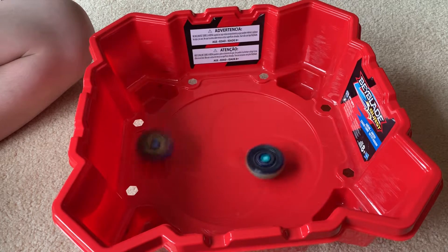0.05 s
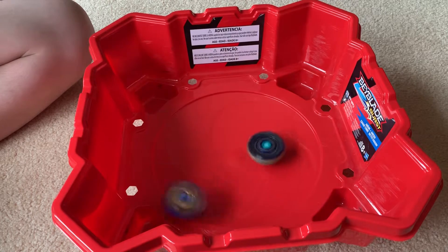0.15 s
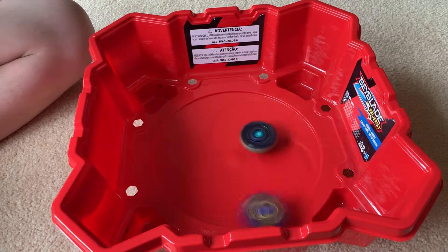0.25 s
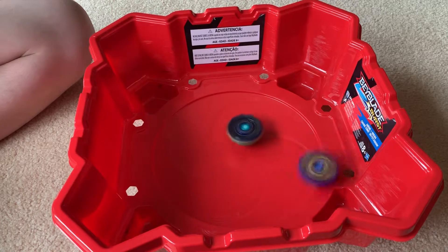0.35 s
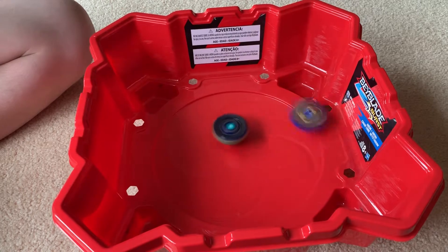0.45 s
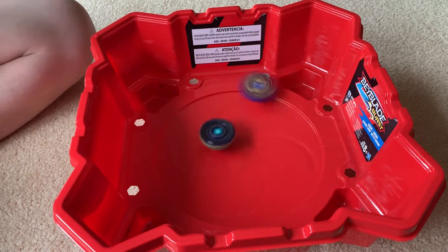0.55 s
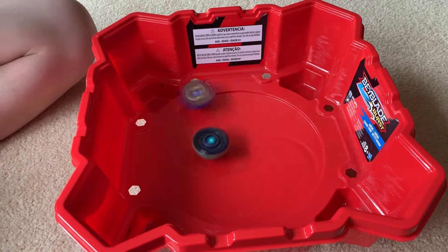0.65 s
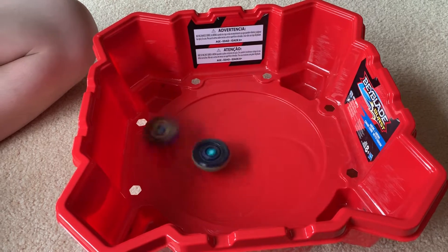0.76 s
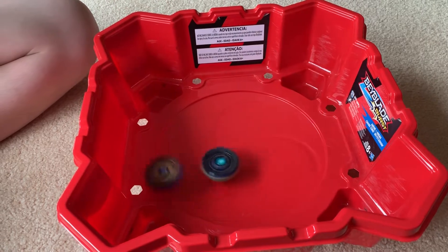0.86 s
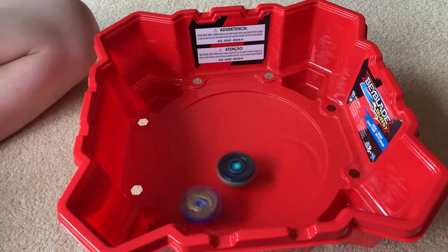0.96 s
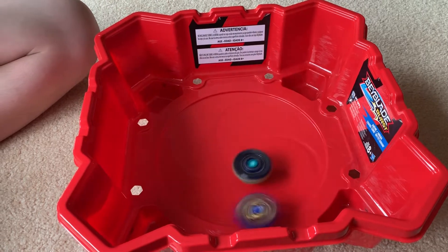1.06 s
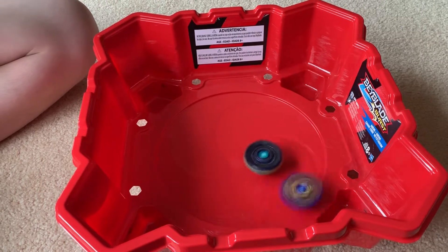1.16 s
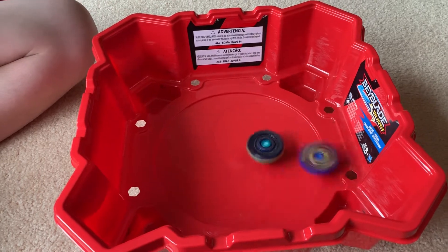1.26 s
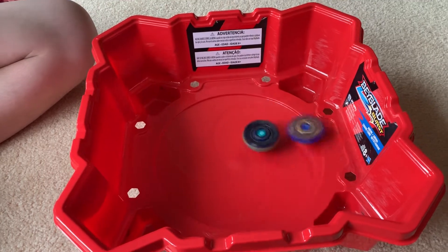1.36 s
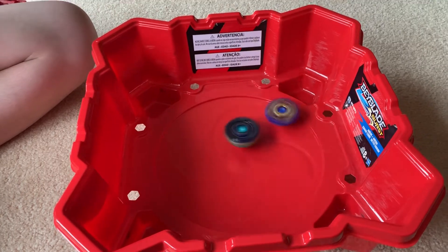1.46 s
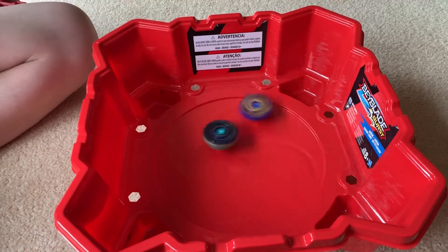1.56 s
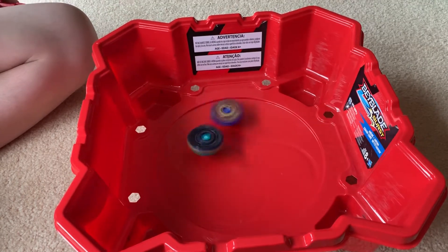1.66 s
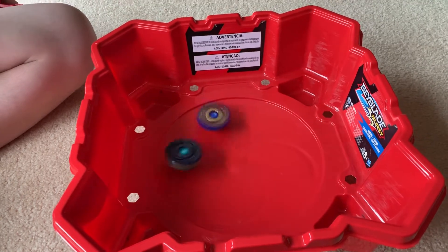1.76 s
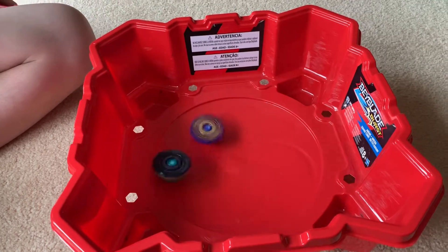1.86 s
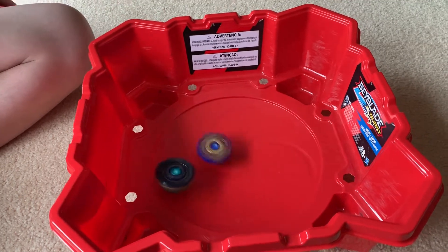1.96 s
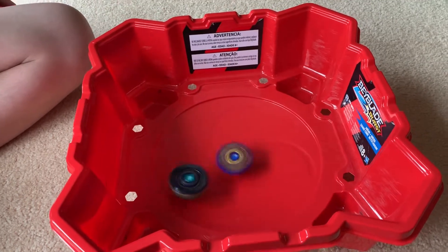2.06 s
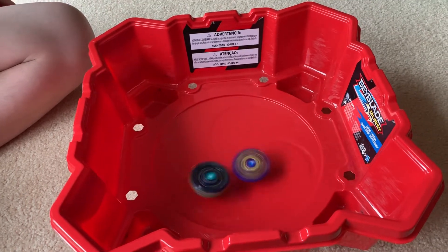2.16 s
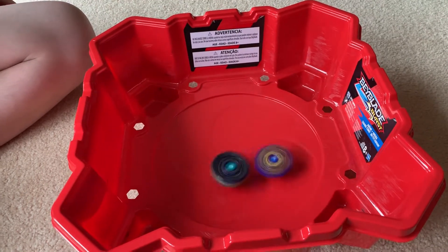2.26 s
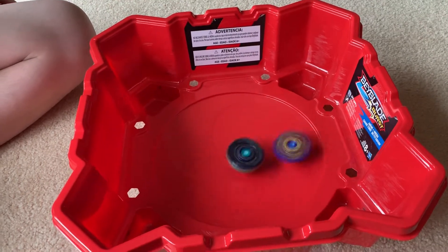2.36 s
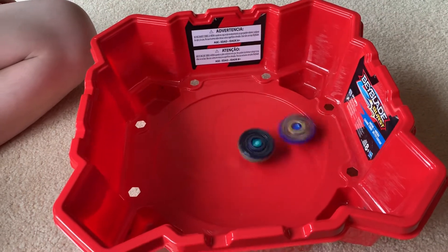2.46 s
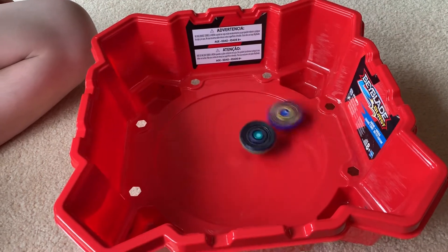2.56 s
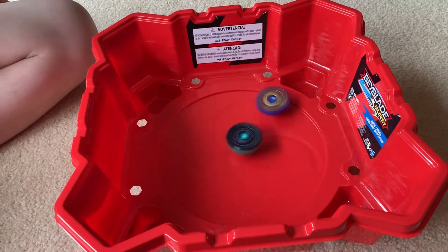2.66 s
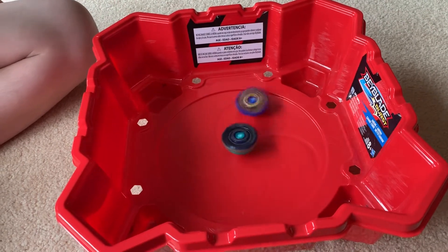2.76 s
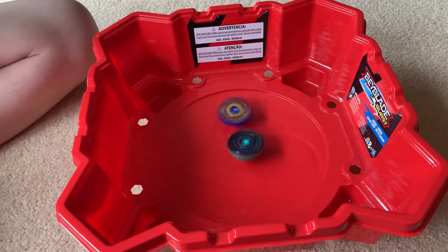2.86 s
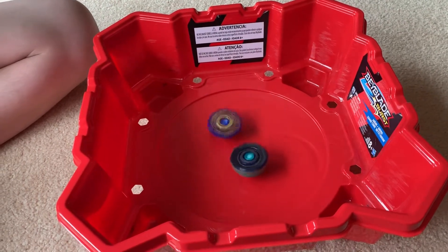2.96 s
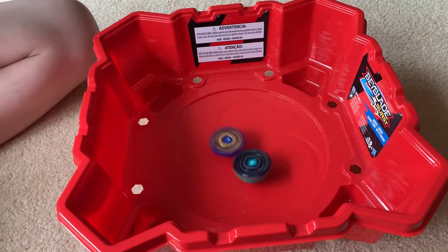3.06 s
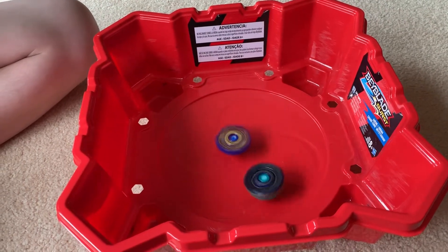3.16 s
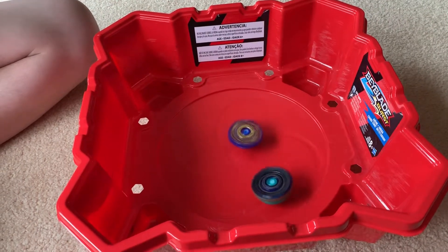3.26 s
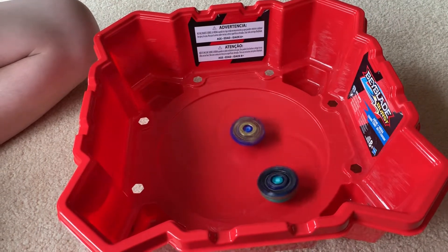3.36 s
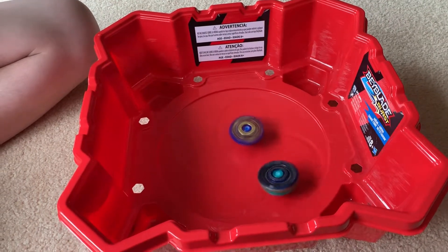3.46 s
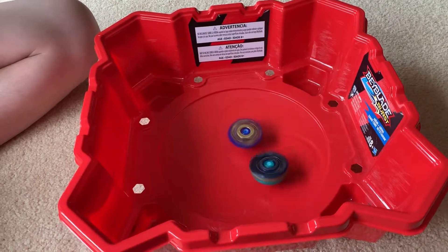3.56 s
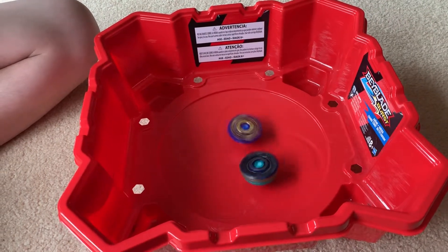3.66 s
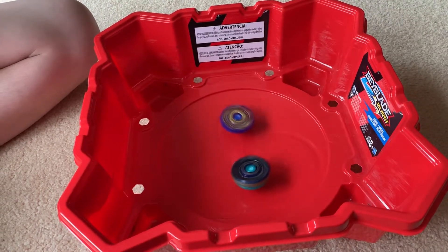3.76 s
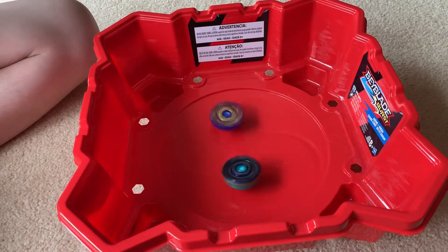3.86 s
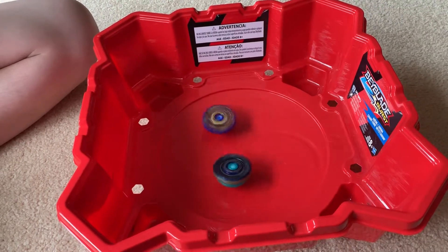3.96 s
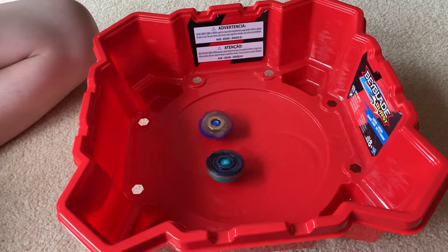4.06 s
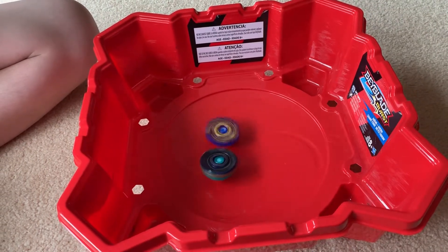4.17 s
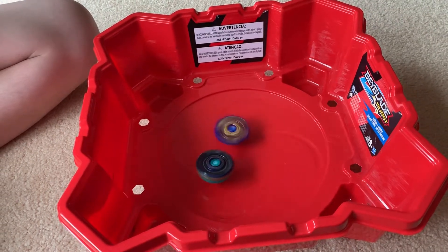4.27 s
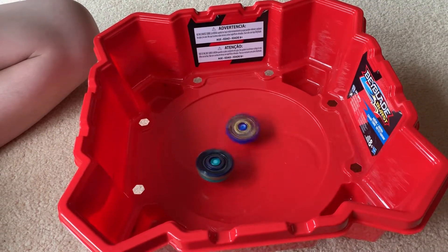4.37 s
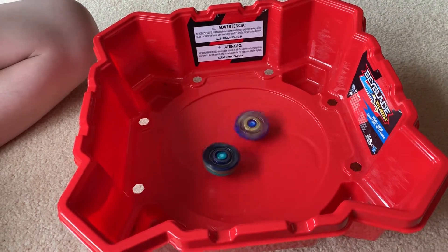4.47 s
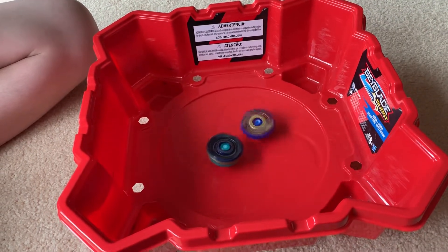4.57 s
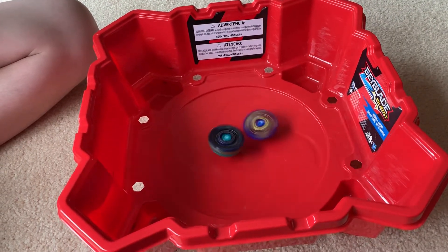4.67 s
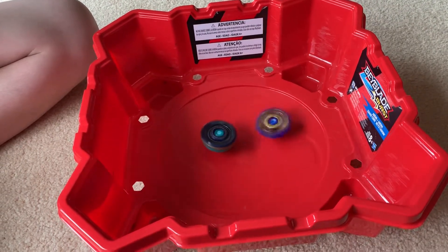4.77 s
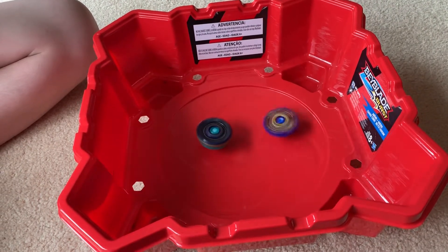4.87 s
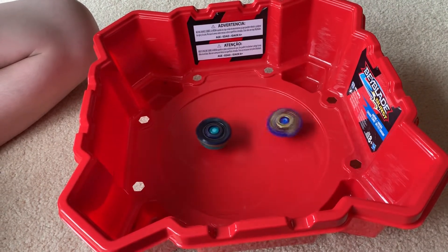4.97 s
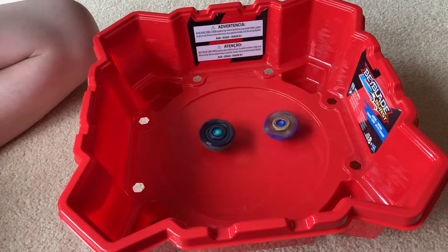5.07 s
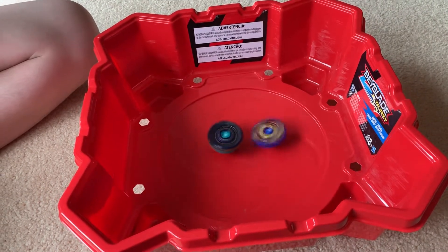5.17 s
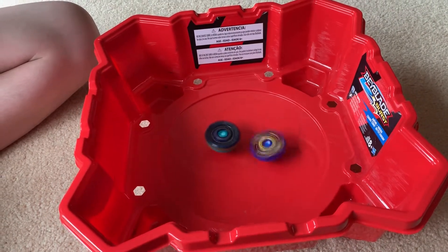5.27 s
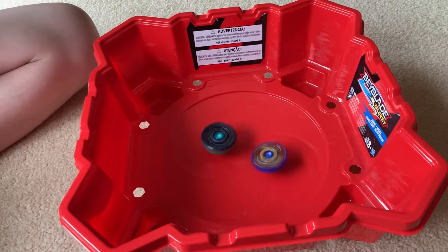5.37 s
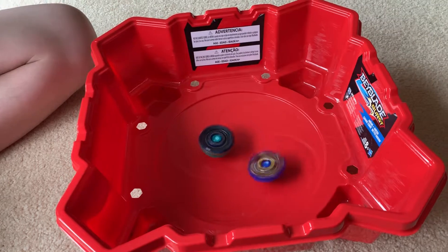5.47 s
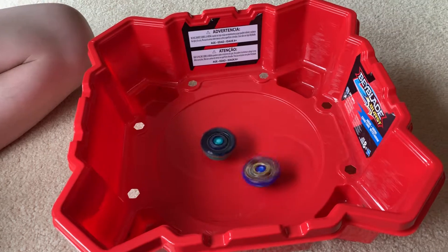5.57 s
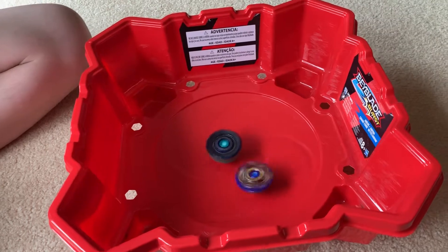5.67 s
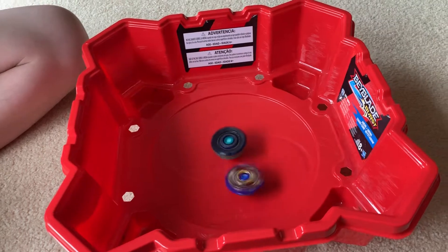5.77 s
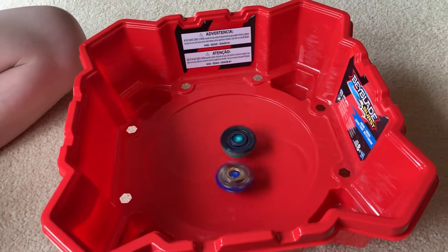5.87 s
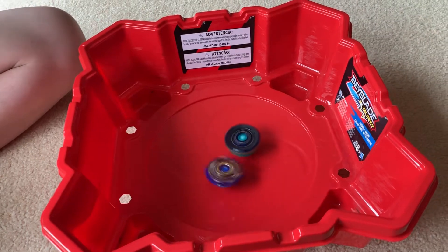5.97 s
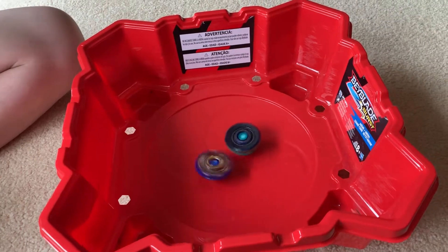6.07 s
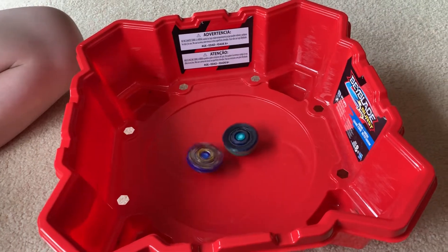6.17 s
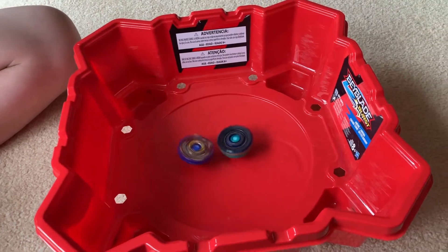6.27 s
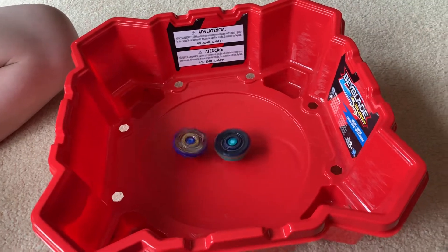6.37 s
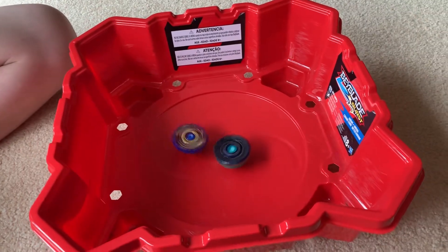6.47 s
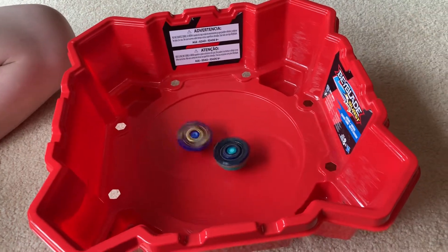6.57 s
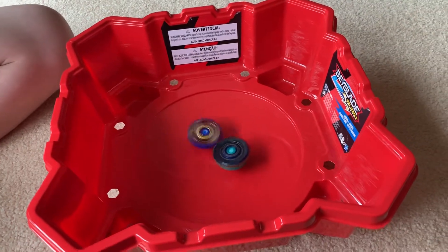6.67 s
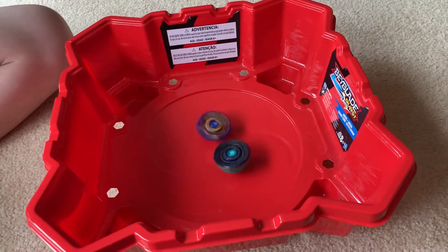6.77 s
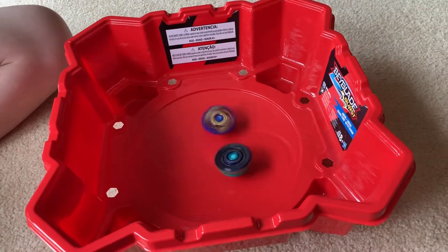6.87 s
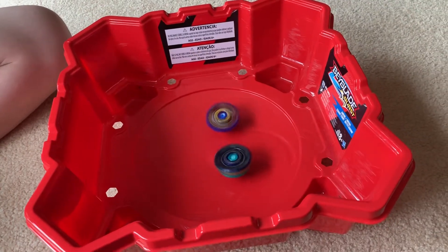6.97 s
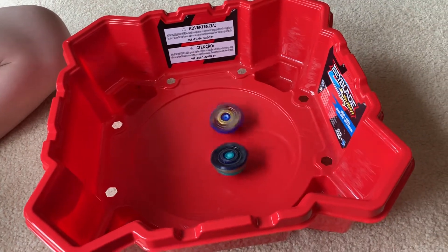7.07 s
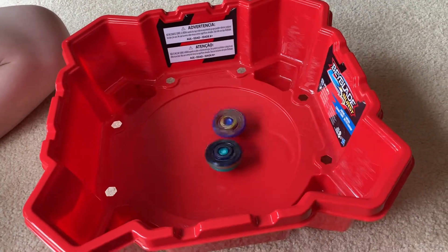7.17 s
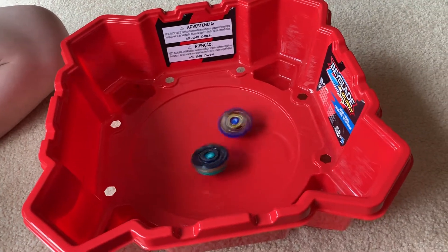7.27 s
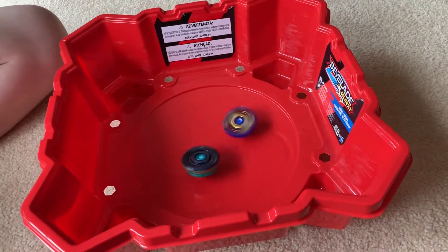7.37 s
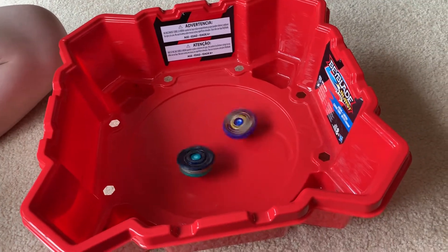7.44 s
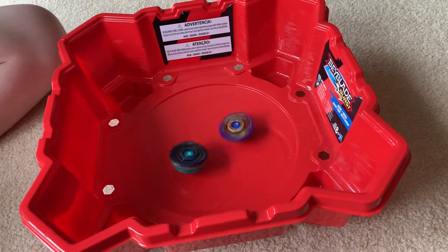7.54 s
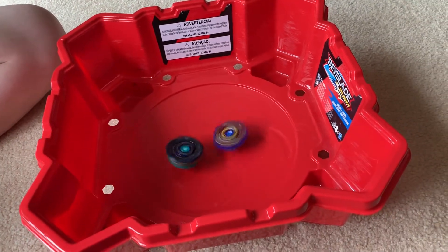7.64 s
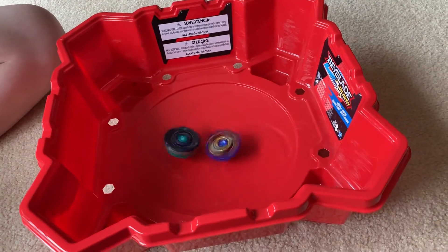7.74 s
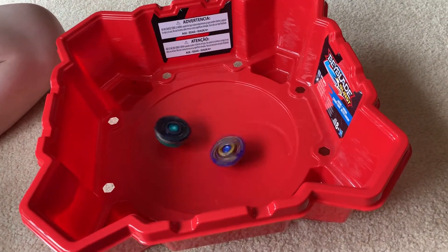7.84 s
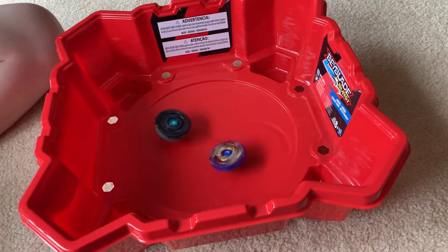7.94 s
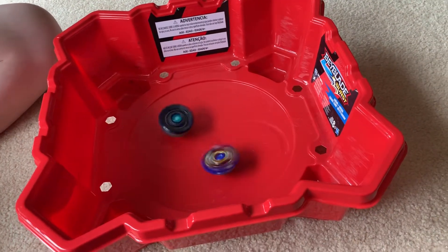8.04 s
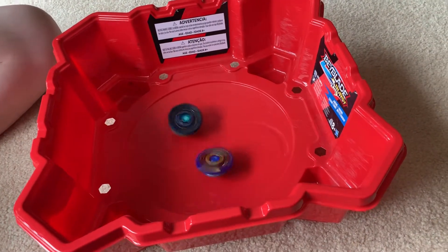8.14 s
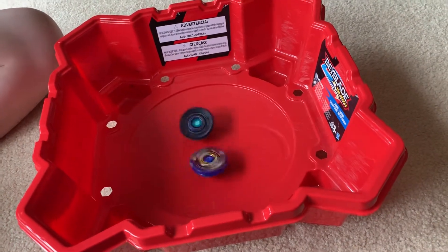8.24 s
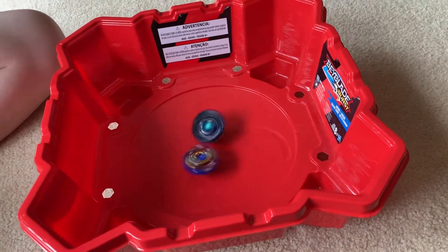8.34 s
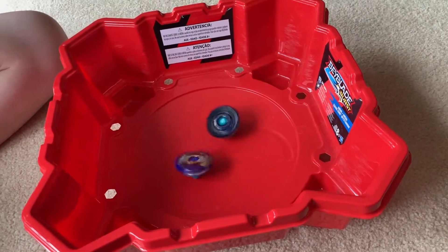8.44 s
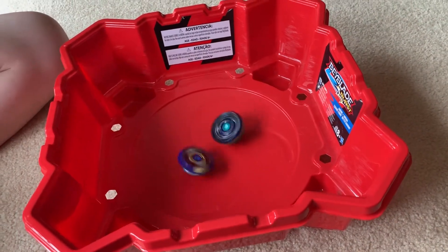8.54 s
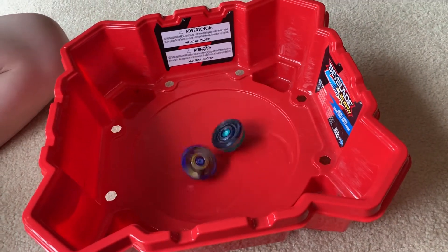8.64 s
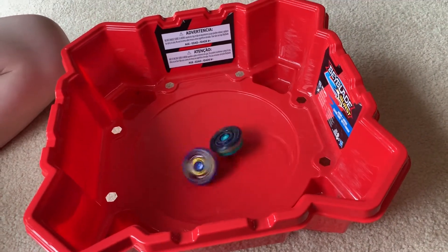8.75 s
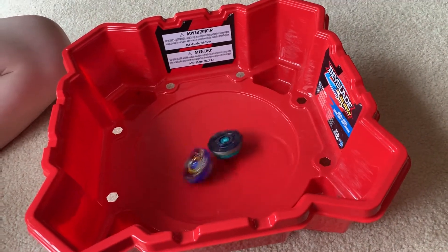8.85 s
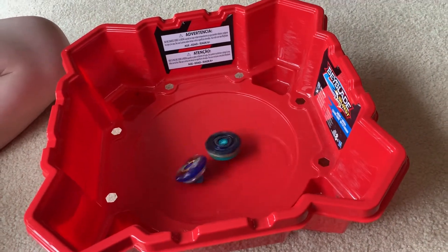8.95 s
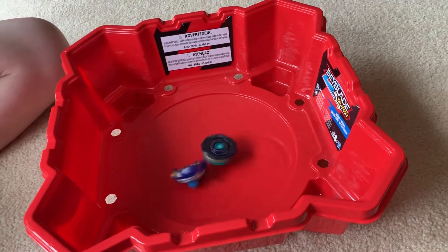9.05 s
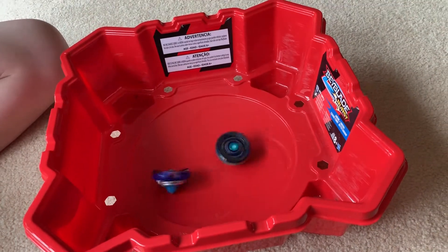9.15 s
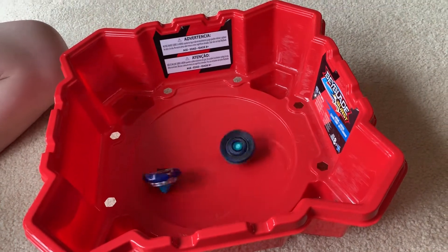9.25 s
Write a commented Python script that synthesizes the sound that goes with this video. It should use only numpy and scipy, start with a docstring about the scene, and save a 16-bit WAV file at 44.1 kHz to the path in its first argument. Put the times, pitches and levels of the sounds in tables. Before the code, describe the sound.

Close, dry rattling buzz of a toy top scraping a plastic arena, giving way to spaced bright clacks, faint ticks and a final scuffle.

```python
"""Two toy tops spin in a thin plastic bowl on a carpet, close to a pair of microphones.
At first a tip skids round the slope, drumming once a turn; from about one second the notched rims clack.
Then both circle lower, tips tapping and sliding on the bowl, until a last flurry higher on the slope.
Noise bursts ring the resonances of bowl and rims, sines ring the metal; sliding is resonant noise.
A limiter squeezes the loud clacks and lets their tails swell."""
import sys
import numpy as np
from scipy import signal
from scipy.fft import rfft, irfft, next_fast_len
from scipy.io import wavfile
from scipy.ndimage import uniform_filter1d

SR = 44100
rng = np.random.default_rng(int(sys.argv[2]) if len(sys.argv) > 2 else 0)


def digitize_waveform(pressure):
    """Quantize a signal to 16-bit integers and store it at the path in sys.argv[1].

    Rows of a 2-D input are taken as channels; values are limited to [-1, 1].
    """
    field = np.atleast_2d(pressure).T
    bounded = np.clip(field, -1, 1)
    quanta = np.round(bounded * 32767).astype(np.int16)
    wavfile.write(sys.argv[1], SR, quanta)


N = 410571

# Spin of the tops. Each row: time in seconds, mean turns a second, hum of the imbalance in dB.
TOP_SPIN = [(0, 52.6, -57), (0.499, 53, -46), (.95, 50.7, -59), (1.4, 47.5, -47.5), (1.801, 55.4, -57),
            (2.2, 49, -67.5), (5.5, 36.2, -73), (9.31, 33.5, -72.5)]
# Where the tips touch. Each row: time in seconds, share of contact high on the slope (0-1).
SLOPE_SHARE = [(0, 0.9), (1.2, 0.95), (1.7, 0.66), (2.5, 0.46), (8.6, 0.3), (8.85, .75), (9.31, 0.66)]
# Wall panels of the bowl. Each row: pitch in Hz, width in Hz, dB struck at the centre, dB struck on the slope.
WALL_PANELS = [(283, 66, 3, -14), (350.3, 81, -3, 0), (460.7, 267, -5.5, 2.5), (797, 151, 1, 0),
               (1140, 151, -2, -1), (1660, 380, -17.5, -3), (2127, 296, -14.5, -3),
               (3320, 1400, -19.5, -14.5)]
# The whole bowl rocking on the carpet: pitch in Hz, width in Hz.
BOWL_ROCK = (85, 38)
# The floor of the bowl as a drum: pitch in Hz, width in Hz.
FLOOR_DRUM = (147.8, 44.7)
# Colour of a tip scraping plastic. Each row: frequency in Hz, level in dB.
SCRAPE_COLOUR = [(2800, -2.5), (5000, -6), (8000, 2.5), (11000, 0.5), (14000, -5.5), (16500, -16.5)]
NEAREST_HZ = 973.6  # middle pitch of the panel nearest to a skid landing


def amp(db):
    """Decibels to gain."""
    return 10 ** (np.asarray(db) / 20)


def evened(x):
    """Scales to rms 1."""
    return x / np.sqrt(np.mean(x ** 2) + 1e-20)


def peaked(x):
    """Scales to peak 1."""
    return x / abs(x).max()


def add(mix, s, sound):
    """Adds a two-channel sound at s seconds."""
    part = mix[:, round(s * SR):][:, :sound.shape[1]]
    part += sound[:, :part.shape[1]]


def resonate(x, hz, width):
    """A resonance of gain 1 at its peak, applied twice for steep skirts."""
    b, a = signal.iirpeak(hz, hz / width / 1.5, SR)
    return signal.lfilter(b, a, signal.lfilter(b, a, x))


def wandering(x, hz, width):
    """A resonance that follows the curve hz: shift down, smooth twice, shift back."""
    turn = np.exp(2j * np.pi * np.cumsum(hz) / SR)
    r = np.exp(-np.pi * width / SR)
    smooth = signal.lfilter([(1 - r) ** 2], [1, -2 * r, r ** 2], x / turn)
    return 2 * (turn * smooth).real


def burst(rise, fall, size=2600):
    """Two unrelated puffs of contact noise with peak near 1; rise and fall in seconds, size in samples."""
    t = np.arange(size) / SR
    shape = (1 - np.exp(-t / rise)) * np.exp(-t / fall)
    return rng.standard_normal((2, size)) * shape / shape.max()


def coloured(x, points):
    """Shapes x by a spectrum of (Hz, dB) points."""
    f, db = np.transpose(points)
    size = next_fast_len(x.shape[1])
    hz = np.fft.rfftfreq(size, 1 / SR)
    gain = amp(np.interp(np.log(hz + 1), np.log(f), db))
    return irfft(rfft(x, size) * gain, size)[:, :x.shape[1]]


def drift(per_s):
    """Slow chance of rms near 1, without wild peaks."""
    steps = 1.9 * np.tanh(rng.standard_normal(round(N / SR * per_s) + 2) / 1.6)
    return np.interp(np.linspace(0, len(steps) - 1, N), np.arange(len(steps)), steps)


def slope_at(s):
    """Share of the contact that is high on the slope at s seconds."""
    return np.interp(s, *np.transpose(SLOPE_SHARE))


def hush():
    """The faint steady background: noise shaped by a spectrum."""
    # Each row: frequency in Hz, density in dB per Hz before the whole is scaled to its level.
    hush_colour = [(15, -26.5), (25, -2), (145, 1.5), (354, -3), (503, -19), (1190, -18.5), (3080, -30),
                   (8360, -32), (9840, -38), (11600, -41.5), (16000, -61)]
    return amp(-58.5) * evened(coloured(rng.standard_normal((2, N)), hush_colour))


def room(x):
    """Sparse echoes of random sign, each band dying at its own speed."""
    # Decay of the place. Each row: frequency in Hz, time to fall by 60 dB in seconds.
    room_decay = [(150, 0.37), (400, 0.42), (900, 0.2), (2300, 0.21), (6000, 0.18), (14000, 0.12)]
    echoes = np.zeros((2, SR // 2))
    at = np.arange(460, SR // 2 - 20, 20)  # samples; one echo in each stretch of 20
    signs = rng.choice([-1., 1.], (2, len(at)))
    np.put_along_axis(echoes, at + rng.integers(0, 20, (2, len(at))), signs, 1)
    hz, t, z = signal.stft(echoes, SR, nperseg=256)
    f, t60 = np.transpose(room_decay)
    band_t60 = np.interp(np.log(hz + 1), np.log(f), t60)[:, None]
    tail = signal.istft(z * amp(-60 * t / band_t60), SR, nperseg=256)[1]
    return signal.oaconvolve(x, tail / np.linalg.norm(tail[0]), axes=1)[:, :N]


def bowl(x, s, scatter_db):
    """The wall panels ring, each more or less by where the bowl is struck."""
    slope = slope_at(s)
    out = np.zeros_like(x)
    for hz, width, mid_db, high_db in WALL_PANELS:
        db = mid_db + slope * (high_db - mid_db) + scatter_db * rng.standard_normal()
        out += amp(db) * resonate(x, hz, width)
    return out


def sliding():
    """The off-centre tip kicks the bowl once a turn and drags between kicks; contact wanders over the panels."""
    # Tips sliding. Each row: time in seconds, pressure on the wall panels in dB, floor drum in dB.
    slide_levels = [(0, -16, -31), (0.029, -35.5, -49), (.09, -17, -48), (.16, -16.5, -53),
                    (0.171, -22, -58), (.19, -42, -58), (.21, -18, -42), (.245, -32, -56),
                    (.262, -22, -35.5), (.3, -23.5, -38), (.38, -22, -47), (.48, -15, -48), (.52, -21, -42),
                    (.6, -26, -49), (.635, -20, -36), (.665, -15.5, -43), (.68, -68, -43),
                    (0.869, -25, -42.5), (.98, -64, -38.5), (1.2, -41, -45.5), (1.451, -44.5, -40),
                    (1.699, -53.5, -48), (1.8, -43.5, -38), (2.1, -51, -53), (2.6, -45, -45.5),
                    (3.161, -53, -51), (3.4, -69.5, -57), (3.63, -52, -77), (3.798, -53.5, -48.5),
                    (4.0, -57, -52), (5.099, -57, -48), (5.45, -62.5, -70), (5.85, -56, -58),
                    (6.55, -65, -65.5), (6.66, -56, -51.5), (7.2, -58, -53), (7.55, -69, -69),
                    (8.351, -57.5, -56), (8.74, -55.5, -54.5), (8.881, -59, -65), (8.929, -29, -40),
                    (8.98, -36.5, -34), (9.079, -40, -50), (9.141, -32, -33), (9.189, -45, -33),
                    (9.22, -37, -59), (9.26, -56.5, -52), (9.31, -59, -42)]
    t = np.arange(N) / SR
    s, *columns = np.transpose(slide_levels)
    panel_db, drum_db = (np.interp(t, s, c) for c in columns)
    hiss_db = -7 + 1.118 * panel_db  # the scrape hiss follows the pressure

    s, speed, hum_db = np.transpose(TOP_SPIN)
    slope = slope_at(t)
    unsteady = 1 + 0.065 * (1 - slope) * drift(per_s=9)
    turns = np.cumsum(np.interp(t, s, speed) * unsteady) / SR

    weight = amp(3.5 * drift(per_s=28))
    throb = np.exp(-(turns % 1) / 0.28) * weight  # dies away within each turn
    kicks = 22 * slope * weight * np.diff(np.floor(turns), prepend=0)
    # a soft push, felt by the low panels only
    kicks = uniform_filter1d(uniform_filter1d(kicks, size=16), size=16)
    rub = rng.standard_normal((2, N)) * amp(4.3 * drift(per_s=240))  # gritty, uneven contact

    panels = np.zeros((2, N))
    for hz, width, mid_db, high_db in WALL_PANELS:
        db = mid_db + slope * (high_db - mid_db) + 4.5 * drift(per_s=16)
        panels += amp(db) * resonate(rub * (0.7 + throb) + kicks, hz, width)
    under_tip_hz = NEAREST_HZ * 1.3 * 2 ** (0.51 * drift(per_s=32))  # the panel under the tip
    panels += amp(-1.5) * wandering(rub * (0.5 + throb), under_tip_hz, 260)

    drum = resonate(rub * (0.21 + throb), *FLOOR_DRUM) + amp(-11) * resonate(rub, *BOWL_ROCK)
    drum *= amp(2.5 * drift(per_s=11))
    hiss = coloured(rub * (0.94 + throb ** 1.9), [(1500, -30.5)] + SCRAPE_COLOUR)
    hum = amp(np.interp(t, s, hum_db) + 2.4 * drift(per_s=10)) * np.sin(2 * np.pi * turns)
    return amp(panel_db) * evened(panels) + amp(drum_db) * evened(drum) + amp(hiss_db) * evened(hiss) + hum


def landings():
    """Rows (s, level dB, tick dB, nearest panel Hz): single landings, and those of each skid, one a turn, uneven."""
    # Single landings. Each row: time in seconds, level in dB, tick against that level in dB,
    # pitch of the nearest panel in Hz.
    single_landings = [(0.003, -4.5, -1.5, 1950), (0.043, -6.5, -3.5, 1170), (0.057, -5, -6, 1900),
                       (0.078, -1.5, -1, 1160), (0.178, 3.5, -32, 2110), (0.228, -10, 4, 890),
                       (0.321, -17, 11.5, 1010), (0.446, -18, 4, 1110), (0.541, -8.5, -2, 1140),
                       (0.561, -9.5, -4, 1163), (0.578, -4.5, -4, 850), (0.597, -8, 2, 890),
                       (0.616, -8, 4, 1820), (0.639, -8, 1, 1270), (0.658, -10, -19, 1160),
                       (0.698, -1, -14, 1110), (0.711, -3, -1, 929), (0.736, -16, 3, 931),
                       (0.748, -31.5, 15, 1150), (0.858, -10, -4.5, 870), (0.954, -13.5, -12, 1980),
                       (0.976, -21, -25, 838), (0.995, 2, -7.5, 930), (1.057, -9, 0.5, 2210),
                       (1.077, -15.5, -1, 1200), (1.098, -9.5, -20, 880), (1.106, -7.5, -8, 960),
                       (1.119, -6.5, -4, 974), (1.161, -10, -3, 1270), (1.182, -10, -6, 818),
                       (1.198, -23.5, 0, 1420), (1.485, -25, 9, 2060), (1.765, -18, 8.5, 420),
                       (1.793, -22.5, 12.5, 960), (2.057, -38, -0.5, 600), (2.081, -37, -5, 951),
                       (2.104, -32, -2, 1000), (2.123, -33, 1, 1450), (2.147, -36, 1, 1480),
                       (2.194, -40.5, 4.5, 1390), (2.238, -42.5, 10.5, 1490), (2.286, -50, 16, 944),
                       (2.334, -35.5, 5.5, 726), (2.395, -47, 15, 980), (2.433, -44, 17.5, 1374),
                       (2.467, -39.5, 13, 867), (2.481, -25, -25, 320), (2.749, -47, 15, 2210),
                       (2.772, -49, 0, 923), (2.805, -50, 13, 1316), (2.835, -50, 12, 1000),
                       (3.277, -30.5, -8, 950), (3.306, -32.5, -2, 940), (3.317, -32, -0.5, 950),
                       (3.368, -45, 7, 1162), (3.738, -37.5, 7, 1629), (3.873, -39.5, -9, 1500),
                       (3.941, -44, -9, 1200), (4.033, -28.5, -5.5, 1290), (4.078, -34.5, -7, 940),
                       (4.092, -38.5, 0, 935), (4.13, -34.5, -1, 960), (4.354, -45, -20, 836.5),
                       (4.378, -36.5, 6.5, 1210), (4.463, -31.5, -2, 1270), (4.541, -30, 1.5, 1830),
                       (4.836, -33.5, -12, 1173), (4.88, -33.5, -4.5, 840), (4.935, -37, 1, 1880),
                       (5.014, -32, -1, 1205), (5.075, -46.5, 7.5, 861.4), (5.12, -38, -6, 800),
                       (5.249, -22, 4, 900), (5.489, -41, -6, 1209), (5.532, -42, -20, 1170),
                       (5.573, -38, -6, 840), (5.635, -40, -2.5, 781), (5.684, -43, -8, 1260),
                       (5.891, -32.5, 1.5, 1165), (5.943, -42, -16, 887), (5.997, -40, -7, 1040),
                       (6.032, -41, -11, 930), (6.079, -37.5, -4.5, 1170), (6.155, -44.5, -9.5, 1245),
                       (6.208, -46, -5, 785), (6.258, -44, 1.5, 810), (6.307, -36.5, -7.5, 990),
                       (6.361, -38, -19, 1660), (6.41, -32, -20, 851), (6.464, -32.5, -25.5, 870),
                       (6.521, -35.5, -24.5, 884), (6.578, -41.5, -16.5, 886), (6.648, -49.5, -11.5, 1800),
                       (6.663, -43, -15, 1830), (6.96, -42.5, -16, 917), (7.02, -37, 0, 1017),
                       (7.145, -42, -6, 942), (7.322, -49, -14, 990), (7.448, -40, -6.5, 1370),
                       (7.58, -41, -3.5, 1660), (7.618, -47, -11.5, 1174), (7.681, -43, -5.5, 1215),
                       (8.157, -44, -15.5, 1163), (8.24, -44.5, -18, 1110), (8.625, -37.5, 2, 1143),
                       (8.651, -34, -8, 1197), (8.731, -35, -3, 1100), (8.751, -32, -6, 1180),
                       (8.778, -31.5, 0, 1140), (8.946, -21, 2, 1910), (8.994, -23.5, 4.5, 867),
                       (9.034, -32, -2, 1130), (9.055, -25, -2.5, 1121), (9.139, -31, -8, 600),
                       (9.152, -24.5, 5, 973), (9.2, -29.5, 7, 1193), (9.225, -37.5, 13, 1660),
                       (9.277, -28, -4.5, 1222)]
    # A skidding tip lands once a turn. Each row: first and last landing in seconds,
    # first and last level in dB, tick against the level in dB.
    skid_runs = [(0.098, 0.16, -10, -2.5, -25.5), (0.2, 0.24, -11, -7.5, 1),
                 (0.275, 0.428, -11, -11.5, 2.5), (0.467, 0.52, -12.5, -10.5, 2),
                 (0.77, 0.832, -25.5, -18.5, 5.5), (0.874, 0.935, -29.5, -20, 1),
                 (1.217, 1.445, -27, -31.5, -5)]
    rows = list(single_landings)
    for first, last, first_db, last_db, tick_db in skid_runs:
        turns = round((last - first) * np.interp(first, *np.transpose(TOP_SPIN)[:2]))
        share = np.linspace(0, 1, turns + 1)
        level_chance, tick_chance, pitch_chance = rng.standard_normal((3, turns + 1))
        times = first + share * (last - first)
        levels_db = first_db + share * (last_db - first_db) + 1.5 * level_chance
        ticks_db = tick_db + 1.5 * tick_chance
        rows += zip(times, levels_db, ticks_db, NEAREST_HZ * 2 ** (.35 * pitch_chance))
    return rows


def taps():
    """Each landing ticks and rings the bowl, most of all the nearest panel; near the centre it beats the drum."""
    # Upper modes of the bowl under a landing tip. Each row: middle pitch in Hz, mean level in dB.
    bowl_overtones = [(1750, -4.5), (2400, -7), (3750, -13)]
    out = np.zeros((2, N))
    for s, db, tick_db, nearest_hz in landings():
        slope = slope_at(s)
        touch = burst(.0012, .003 + .003 * slope, size=3600)
        knock = bowl(touch, s, scatter_db=3.5) + amp(5.5) * resonate(touch, nearest_hz, 160)
        for up_hz, up_db in bowl_overtones:
            chance, shift = rng.standard_normal(2)
            knock += amp(up_db + 4.1 * chance) * resonate(touch, up_hz * 2 ** (0.11 * shift), 320)
        knock = peaked(knock) + (1 - slope) * amp(-8) * peaked(resonate(touch, *FLOOR_DRUM))
        skid = burst(.0006, .0012 + .001 * slope, size=3600)  # skids longer on the slope
        tick = coloured(skid, [(1500, -40)] + SCRAPE_COLOUR)
        add(out, s - .001, amp(db) * (knock + amp(tick_db) * peaked(tick)))
    return out


def thump(s, wall_db):
    """The bowl takes the blow through both tips: walls, floor drum and rocking answer one push."""
    # the drum follows the walls in part, less when struck on the slope
    drum_db = -16 + 0.49 * wall_db - 8.5 * slope_at(s)
    push = burst(.002, .005, size=5000)
    walls = bowl(push, s, scatter_db=2.5)
    drum = resonate(push, *FLOOR_DRUM) + amp(-10) * resonate(push, *BOWL_ROCK)
    return amp(wall_db) * peaked(walls) + amp(drum_db) * peaked(drum)


def metal_ring():
    """The metal disc rings as decaying sines; each mode's level flutters at random as it decays."""
    # Modes of the disc, the lowest a beating pair. Each row: pitch in Hz, level in dB,
    # time to fall by 60 dB in seconds.
    disc_modes = [(6222, -2, .5), (6290, -6, .42), (8240, 8, .1), (6740, -4, .13), (12160, 5, .07)]
    t = np.arange(SR // 2) / SR
    ring = np.zeros(len(t))
    for hz, db, t60 in disc_modes:
        flutter_db = np.interp(t, np.linspace(0, .5, 30), 4.5 * rng.standard_normal(30))
        ring += amp(db - 60 * t / t60 + flutter_db) * np.sin(2 * np.pi * (hz * t + rng.random()))
    return np.array([ring, ring])


def rim_blow(dull_db, bright_db):
    """The notched rims strike and rebound within milliseconds, and the tops rattle as they part."""
    # Modes of the rim. Each row: middle pitch in Hz, width in Hz, mean level in dB.
    rim_modes = [(1240, 521, 4.5), (2440, 800, 10), (4460, 840, 7.5), (6630, 830, -0.5), (7470, 370, -6.5),
                 (8218, 2270, 1.5), (10390, 3300, -2.5), (11850, 290, -5.5), (12670, 2500, -3.5),
                 (15700, 2700, -23.5)]
    # Bodies of the tops, heard as they part: pitch in Hz, width in Hz, level in dB.
    body_hz, body_width, body_db = (3400, 4100, 0.5)
    chatter, rattle = np.zeros((2, 2, 2600))
    gaps = rng.uniform(.0005, .0013, size=12)
    for late in np.cumsum(gaps) - gaps[:8].sum():  # seconds from the blow
        # quick small contacts swell into the blow, rebounds fade
        db = -8 + 3300 * late if late < -1e-6 else -3600 * late
        add(chatter, .011 + late, amp(db) * burst(.0003, .0006))
    for late, db in zip(rng.uniform(.012, .056, size=7), rng.uniform(-34.5, -25, size=7)):
        add(rattle, late, amp(db) * burst(.0004, .002))

    rim = amp(body_db) * resonate(rattle, body_hz, body_width)
    for hz, width, db in rim_modes:
        chance, shift = rng.standard_normal(2)  # each blow meets another stretch of the rim
        dull = hz < 5000
        mode_db = db + 2.5 * chance + dull_db * dull + bright_db * (hz > 10000)
        mode_hz = hz * 2 ** ((.25 if dull else .086) * shift)
        rim += amp(mode_db) * resonate(chatter + .5 * rattle, mode_hz, width)
    return peaked(rim)


def clacks():
    """The rims meet: a blow on the plastic, a thump that spreads through the bowl, a ring of the metal."""
    # Rims meeting. Each row: time in seconds, blow in dB, dull part of the rim in dB, bright part
    # of the rim in dB, thump of the bowl in dB, ring of the metal disc in dB.
    rim_clacks = [(1.0389, -2.5, -9, -1, -7, -60), (1.4582, 0.5, -17, 0.5, -25.5, -60),
                  (1.7353, 3.5, -17, -2.5, -26.5, -48), (2.5487, -11, -22, -16, -38, -62.5),
                  (2.555, -1, -19.5, -3, -37.5, -62.5), (2.5623, -9.5, -24.5, -9, -36.5, -65.5),
                  (2.6053, -2, -24, -1.5, -38, -62), (2.6319, 0, -27, -3, -31, -41.5),
                  (2.869, 3, -15.5, 0.5, -28, -71.5), (2.8758, -13.5, -17, -0.5, -23, -61),
                  (3.1222, 8, -10.5, 5.5, -13.5, -55), (3.6596, 1, -16, 0.5, -16, -53.5),
                  (4.1672, 3, -19, 0.5, -21, -51.5), (4.6962, 0.5, -10.5, 2, -18, -40),
                  (5.2285, -5, -21.5, -2, -29, -58), (5.2382, 0, -19, 2, -32, -52),
                  (6.755, 0.5, -13.5, 3.5, -25.5, -49.5), (7.2323, -2, -18, 3.5, -23.5, -59),
                  (7.2352, -1.5, -11.5, 0.5, -27, -52), (7.7955, 0, -12.5, 3, -18.5, -45.5),
                  (8.3956, 2.5, -12, 3, -20, -62), (8.7932, -9.5, -10, -1, -20.5, -62),
                  (8.8092, -19, -17, -14, -18.5, -65), (8.9039, 0, -16, 1.5, -15, -60),
                  (8.9169, -17, -9, -11, -21, -66), (8.9359, -9, -10, 7, -28, -66),
                  (9.1059, -4.5, -7, 6, -22, -62), (9.114, -2, -23, 6.5, -32, -64)]
    out = np.zeros((2, N))
    for s, blow_db, dull_db, bright_db, wall_db, ring_db in rim_clacks:
        add(out, s - .0115, amp(blow_db) * rim_blow(dull_db, bright_db))  # starts early for the swell
        add(out, s - .001, thump(s, wall_db))
        add(out, s, amp(ring_db) * metal_ring())
    return out


def scene():
    """Two unrelated sound paths of the same events, which the microphone ports blend."""
    hits = clacks()
    rest = taps() + sliding()
    return hits + amp(-11.5) * room(hits) + rest + amp(-12.5) * room(rest) + hush()


def record(dry):
    """The port pair, a limiter that acts at once and recovers gradually, then the band limit."""
    # The two microphone ports. Each row: frequency in Hz, likeness (0-1), phase by which
    # the right leads in radians, left over right in dB.
    port_pair = [(200, .93, 0, 0), (1200, .88, .2, 2), (2000, .6, -1.2, 1), (3000, .4, -2.6, 0),
                 (4500, .6, -5, -4), (6000, .6, -4.6, -5), (7200, .75, -6.6, 1), (8300, .95, -5.9, 1),
                 (9700, .97, -3.14, 0), (11500, .95, 0, 0), (12300, .95, .5, 0), (13500, .97, 3.14, 0),
                 (14800, .95, 5.9, 0), (16500, .95, 6.6, 0)]
    size = next_fast_len(N)
    hz = np.fft.rfftfreq(size, 1 / SR)
    f, *columns = np.transpose(port_pair)
    same, lead, balance_db = (np.interp(hz, f, c) for c in columns)
    a, b = rfft(dry, size)
    left = a * amp(balance_db / 2)
    right = (same * a + np.sqrt(1 - same ** 2) * b) * np.exp(1j * lead) * amp(-balance_db / 2)
    pair = irfft(np.array([left, right]), size)[:, :N]

    power_db = 10 * np.log10(abs(uniform_filter1d((pair ** 2).mean(0), 90)) + 1e-12)
    fall = np.arange(N) * 600. / SR  # the held level recovers by 600 dB a second
    held_db = np.maximum.accumulate(power_db + fall) - fall
    over_db = np.maximum(held_db + 15, 0)  # threshold -15 dB
    limited = pair / amp(0.48 * uniform_filter1d(over_db, 60))
    low_pass = signal.firwin(301, 16400, window=("kaiser", 9), fs=SR)  # edge in Hz
    return signal.oaconvolve(limited, low_pass[None], "same")


dry = scene()
out = record(dry)
digitize_waveform(out)
```